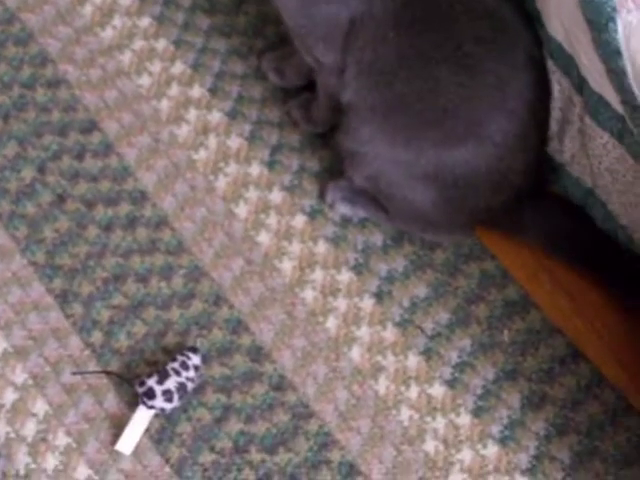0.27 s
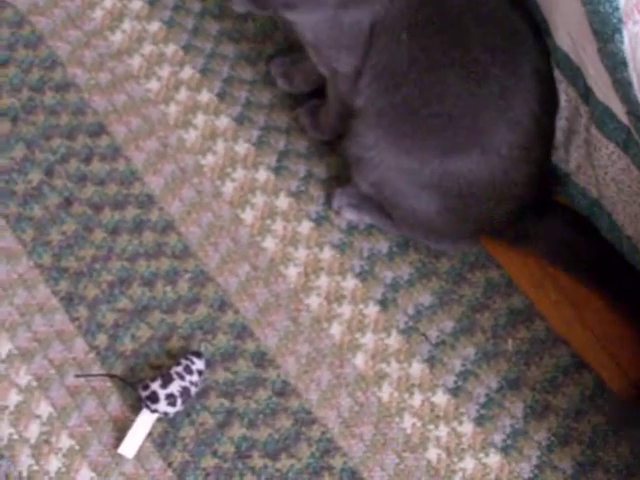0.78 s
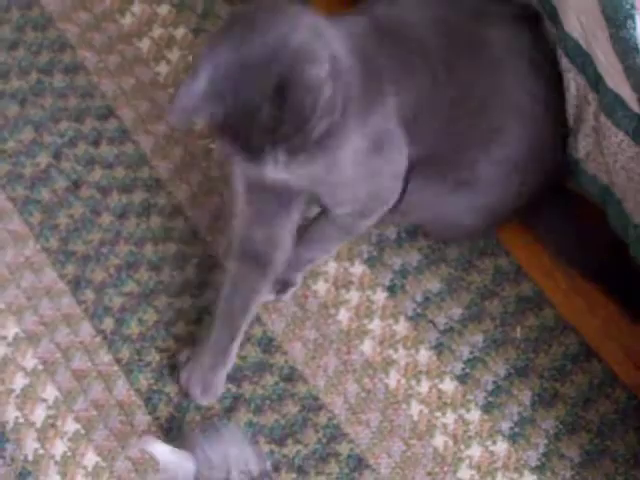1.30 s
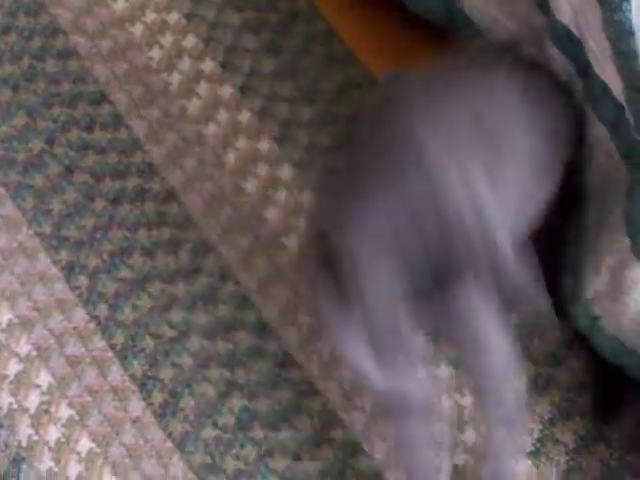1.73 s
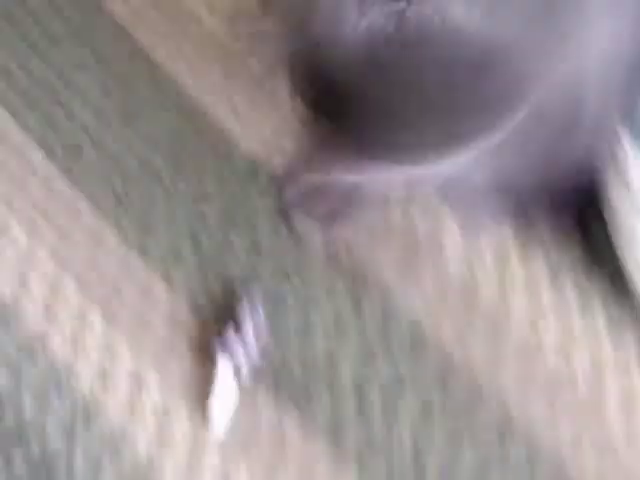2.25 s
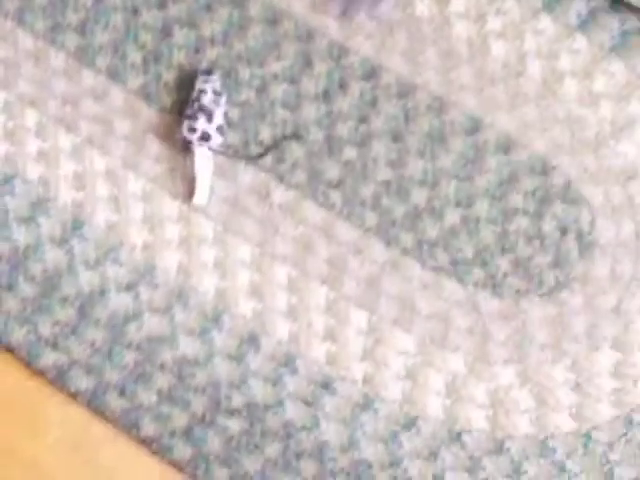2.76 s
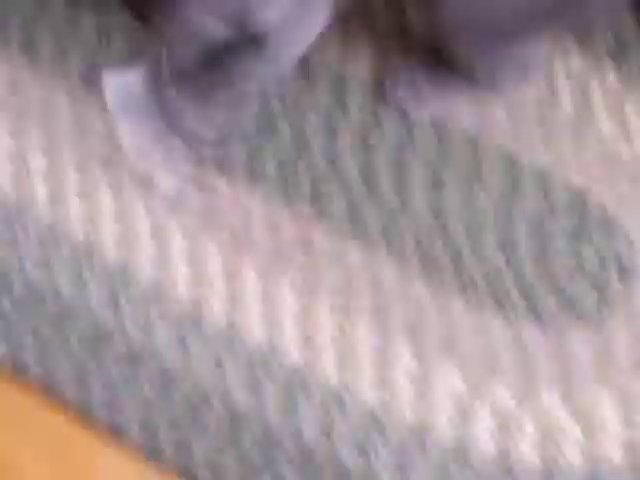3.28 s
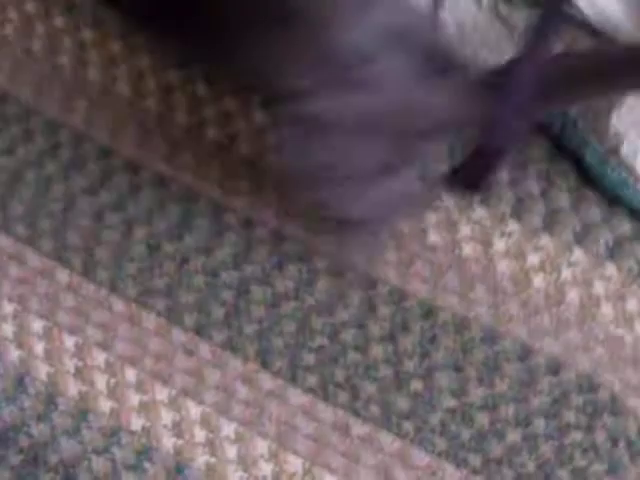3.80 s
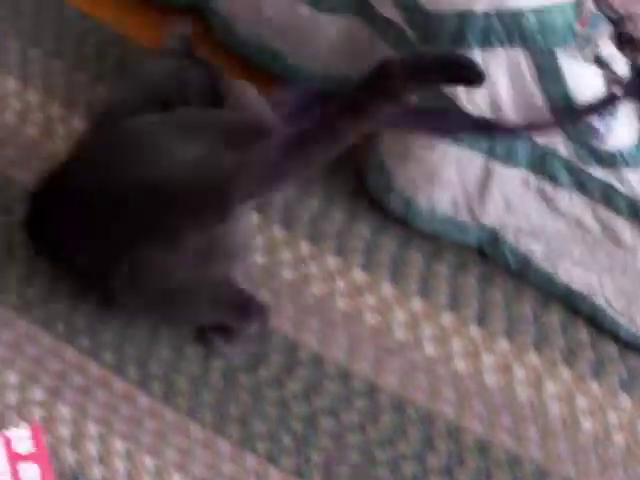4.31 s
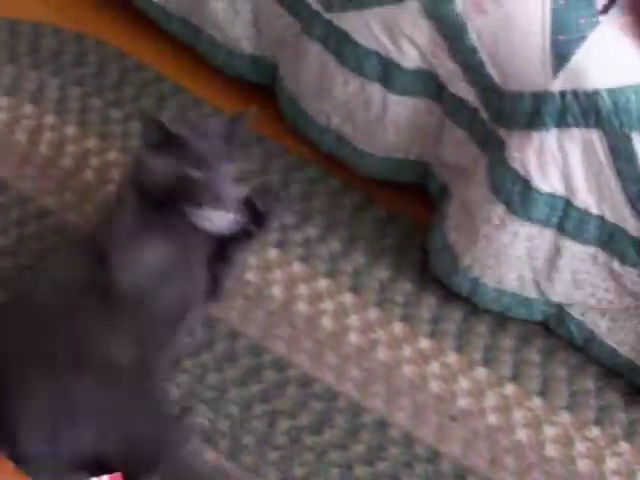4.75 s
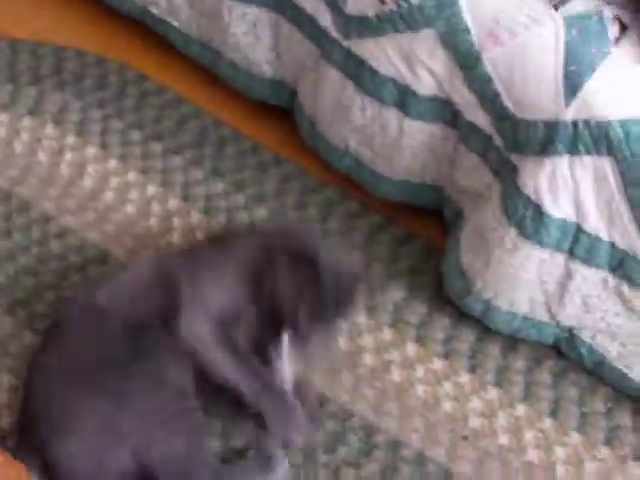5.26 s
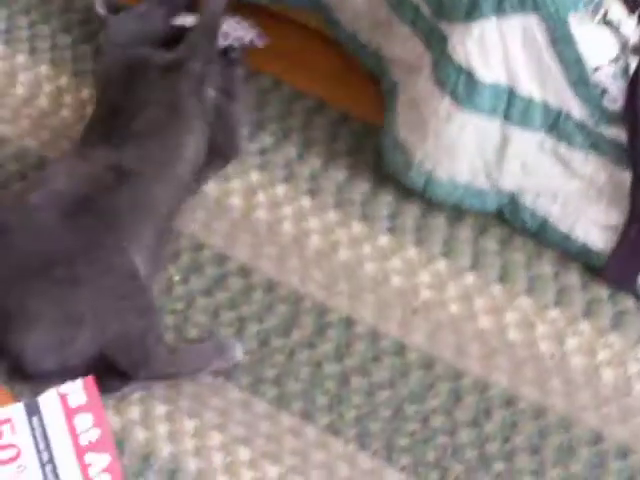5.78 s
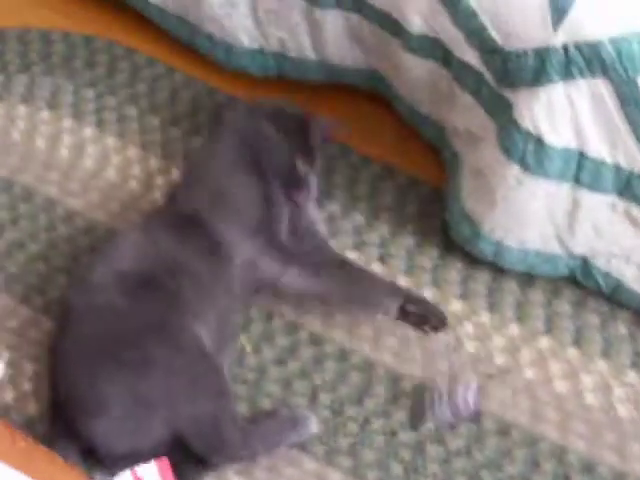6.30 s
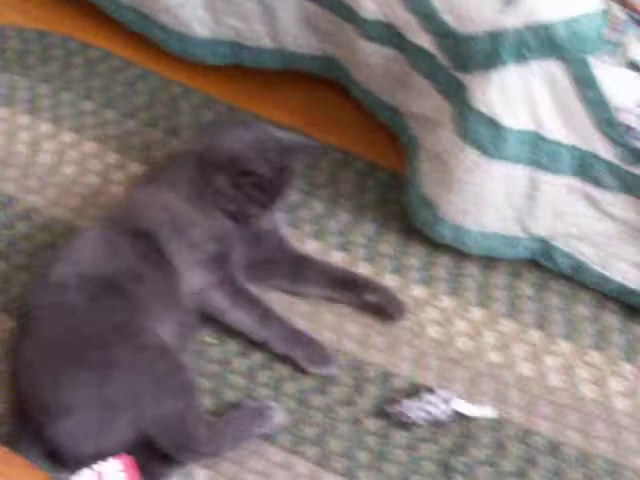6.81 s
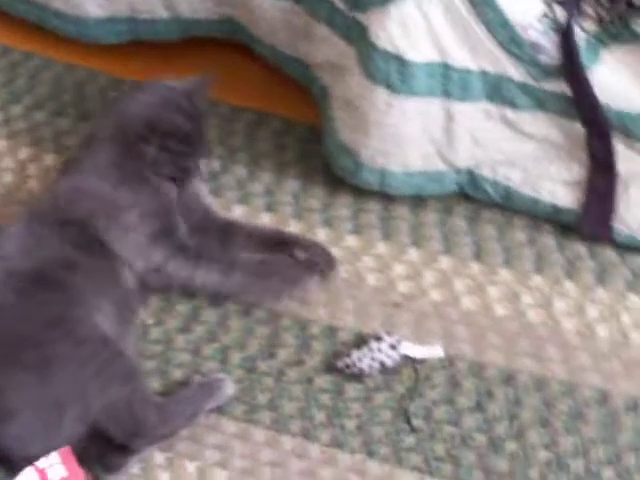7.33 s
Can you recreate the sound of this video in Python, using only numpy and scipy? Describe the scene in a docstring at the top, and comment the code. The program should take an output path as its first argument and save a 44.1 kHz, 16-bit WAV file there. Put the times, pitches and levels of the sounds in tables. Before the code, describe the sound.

A cat plays on a woven rug over floorboards, close to a hand-held microphone in a quiet room with low hiss. The first second holds only faint paw scuffs and a couple of small claw ticks. From about 1.4 seconds the scuffs quicken, with crisp snaps of claws catching threads and a pounce thumping at 2.1 seconds. More dull thumps, scrapes and snaps follow from 2.7 seconds, peaking in a sharp scrabble and landing at 4 seconds. Between 4 and 4.9 seconds a strap's plastic fitting clacks dryly against the microphone's case several times, loudest at about 4.8, over a faint, dull hand rub. The play then softens: light brushing of fur and paws, a scuff and claw snap near 5.6 seconds, a few ticks and gentle bumps from 6.1 to 6.5, and a faint tick at 7 before it settles around 7.5 seconds.

```python
"""A quiet room with a braided rug on a wooden floor, heard close up on a hand-held camera's microphone.
A cat stalks, pounces on and wrestles a toy mouse: paws scuff the weave, claws catch and snap free,
landings thump the boards and fur brushes the pile. Right at the microphone the loose strap clacks
against the camera body, and the hand rubs as it shifts its grip."""
import sys
import numpy as np
from scipy import signal
from scipy.fft import rfft, irfft, next_fast_len
from scipy.io import wavfile
from scipy.ndimage import map_coordinates

SR = 44100
rng = np.random.default_rng(int(sys.argv[2]) if len(sys.argv) > 2 else 0)


def materialize(psi):
    """Save the field psi as 16-bit PCM at rate SR to the path in sys.argv[1].

    A 1-D psi becomes a single channel; in a 2-D psi each row is a channel.
    """
    bounded = np.clip(np.atleast_2d(psi).T, -1, 1)
    quanta = np.round(bounded * 32767).astype(np.int16)
    wavfile.write(sys.argv[1], SR, quanta)


N = 332514
STROKE_S = 0.4

# Spectrum of the weave under a paw, close up: frequency_hz, level_db
WEAVE_SPECTRUM = [(100, -25.5), (400, 0.5), (900, -5), (1600, -2.5), (2700, -0.5), (4700, 3.5), (6500, -2),
                  (9000, -7)]
# Paw strokes on the rug, close to the microphone: peak_time_s, level_db, rise_s
PAW_STROKES = [(0.245, -55.5, 0.0042), (.33, -48.5, 0.066), (.6, -54.5, 0.046), (1.2, -58.5, 0.17),
               (1.371, -42.5, 0.021), (1.461, -45, 0.009), (1.59, -50, 0.019), (1.724, -42.5, 0.022),
               (1.901, -37.5, .009), (2.014, -45.5, 0.06), (2.169, -30.5, 0.0067), (2.6, -53.5, 0.15),
               (2.791, -46, 0.11), (2.96, -42.5, 0.051), (3.04, -45, 0.037), (3.113, -39, 0.007),
               (3.179, -39, 0.029), (3.342, -40, 0.0032), (3.398, -40, 0.056), (3.609, -47.5, 0.021),
               (3.899, -39, 0.0086), (3.978, -40, 0.016), (4.022, -27, .006), (4.048, -27.5, 0.012),
               (4.214, -39.5, 0.069), (4.36, -46, 0.072), (4.921, -48, 0.1), (5.22, -51, 0.051),
               (5.4, -55.5, 0.099), (5.64, -44, 0.062), (6.1, -52.5, .012), (6.343, -52, 0.012),
               (6.622, -57, .05), (7.319, -53.5, 0.029)]
def paw_scuffs():
    """A paw drags over the braids; a slow drag hisses brighter and dies away later than a jab."""
    out, t = np.zeros(N), seconds(STROKE_S)
    lead_s = 0.12
    for peak_time_s, level_db, rise_s in PAW_STROKES:
        fall_s = 0.078 + 2.64 * rise_s
        drag_hz = 3840 * (rise_s / 0.044) ** 0.2
        rub = filtered(friction(), lambda f: amp(along(WEAVE_SPECTRUM, f)) * band(f, drag_hz, 2.6 * drag_hz))
        # the paw speeds up and slows down smoothly, so the stroke has a rounded top
        swell_db = -9 * (np.maximum(lead_s - t, 0) / rise_s) ** 2.45
        fade_db = -60 * (np.maximum(t - lead_s, 0) / fall_s) ** 1.19
        add(out, peak_time_s - lead_s, amp(level_db + swell_db + fade_db) * unit(rub))
    return out


def friction():
    """One drag: dense tiny slips and a few coarser ones, stuttering as they go."""
    size = int(STROKE_S * SR)
    fine = slips(size, spread_db=2.5, per_s=11000)
    coarse = slips(size, spread_db=2.5, per_s=300)
    return (fine + 0.18 * coarse) * amp(2.1 * wobble(130, size))


def slips(size, spread_db, per_s):
    """Fibres slip at random moments, each a tiny impulse of its own size."""
    slipping = rng.random(size) < per_s / SR
    strength, push = rng.standard_normal((2, size))
    return unit(slipping * amp(spread_db * np.clip(strength, -2, 2)) * push)


# Claws catching in the weave, close up: catch_s, level_db, tone_hz
CLAW_SNAPS = [(0.2547, -28.5, 2820), (0.4933, -33, 4700), (1.3734, -20, 4340), (1.4611, -24, 4810),
              (1.4778, -20.5, 4740), (1.6237, -25, 3670), (1.8966, -18, 3590), (1.8993, -17.5, 3540),
              (2.112, -36, 4560), (2.1721, -11.5, 3800), (2.1755, -16.5, 2130), (2.1805, -15, 4100),
              (2.7272, -18.5, 2670), (3.0105, -22, 3500), (3.1766, -18.5, 4500), (3.2135, -26.5, 2900),
              (3.3372, -17, 2730), (3.584, -20, 3320), (3.6157, -27, 3200), (3.631, -26.5, 4460),
              (3.722, -25.5, 4300), (3.8514, -18, 3880), (3.95, -19, 4200), (3.956, -21, 3330),
              (4.0281, -3, 4700), (4.0778, -7, 3160), (5.638, -20, 5160), (5.7095, -29.5, 4250),
              (6.1744, -23, 3830), (6.3426, -23.5, 3300), (6.3729, -40, 2750), (6.5023, -28, 3040),
              (7.0139, -35.5, 3100)]
def claw_snaps():
    """A claw stretches a thread and lets go; nearby fibres settle and the boards beneath knock."""
    out, t = np.zeros(N), seconds(0.04)
    stretch_s = 0.000856
    settling = amp(-30) * decay(t, 0.04)
    for catch_s, level_db, tone_hz in list(CLAW_SNAPS) + snags(per_stroke=2):
        tear_s = 0.0068 * amp(0.17 * level_db)  # a harder pull tears for longer
        snap = rng.standard_normal(len(t)) * (0.3 * decay(t, tear_s) + settling)
        snap[0] += 1
        tick = filtered(snap, lambda f: band(f, tone_hz, 0.65 * tone_hz)
                        * band(f, 0.7 * tone_hz, 2.2 * tone_hz))
        knock = filtered(snap, lambda f: band(f, 1100, 750) * band(f, 1050, 1100))
        knock_db = -14 - 22 * np.log2(tone_hz / 2440)  # a duller snap knocks harder
        release = 1.095 * peak_one(tick) + amp(knock_db) * peak_one(knock)
        add(out, catch_s + stretch_s, amp(level_db) * release)
    return out


def snags(per_stroke):
    """Small catches near each stroke's peak, stronger in a harder one: catch_s, level_db, tone_hz."""
    peak_time_s, stroke_db, _ = np.repeat(PAW_STROKES, per_stroke, axis=0).T
    scatter, strength, tone = rng.standard_normal((len(peak_time_s), 3)).T
    level_db = -36.5 + 0.72 * (stroke_db - stroke_db.mean()) + 5 * strength
    return list(zip(peak_time_s + 0.013 * scatter, level_db, 4100 * np.exp(0.23 * tone)))


# Resonances of the floorboards under the rug: centre_hz, width_hz, gain_db
BOARD_MODES = [(68, 38, 3), (134.2, 66, 0.5), (208.8, 21.5, 4.5), (305, 62, -9), (439, 110, -12)]
# Spectrum of the joists' slow sway: frequency_hz, level_db
JOIST_SPECTRUM = [(10, -16), (22, 1), (45, 2.5), (85, -1), (130, -1), (300, -30), (1000, -87)]
# Paws and body landing near the microphone: start_s, thud_db, tone_hz, pat_relative_db
LANDINGS = [(1.49, -50.5, 172, -54.5), (1.855, -42.5, 300, -64), (1.9, -38, 186, -68),
            (1.941, -38.5, 171, -68), (2.114, -24, 170, -44.5), (2.163, -34, 130, -41),
            (2.728, -27.5, 405, -40), (2.746, -28.5, 194, -66), (3.002, -30, 250, -42.5),
            (3.024, -24.5, 287, -54.5), (3.171, -42.5, 239, -45), (3.4, -41.5, 206, -70),
            (3.722, -40.5, 350, -43.5), (3.949, -27.5, 129, -39.5), (4.014, -27, 182, -46),
            (4.051, -20.5, 207, -56), (4.33, -41.5, 454, -34), (4.479, -38, 303, -52.5),
            (5.708, -47, 222, -64), (6.335, -47.5, 202, -76), (6.502, -49, 350, -50)]
def landings():
    """A soft paw pats the rug and pushes the boards, which drum on while the joists sway."""
    out, t = np.zeros(N), seconds(0.45)
    average_db = np.mean(LANDINGS, axis=0)[1]
    pat_reference_db = 3
    for start_s, thud_db, tone_hz, pat_relative_db in LANDINGS:
        push = 0.037 * rng.standard_normal(len(t)) * decay(t, t60_s=0.19)
        push[0] += 1
        thud = filtered(push, lambda f: resonances(BOARD_MODES, f) * band(f, tone_hz, 0.43 * tone_hz))
        add(out, start_s, amp(thud_db) * peak_one(thud))
        pat = unit(filtered(rng.standard_normal(len(t)), lambda f: band(f, 440, 500) * band(f, 980, 1900)))
        add(out, start_s, amp(pat_reference_db + pat_relative_db) * pat * decay(t, t60_s=0.11))
        sway = coloured(rng.standard_normal(len(t)), JOIST_SPECTRUM)
        sway_db = -50 + 0.77 * (thud_db - average_db)
        onset = 1 - np.exp(-t / 0.022)
        add(out, start_s, amp(sway_db) * sway * onset * decay(t, t60_s=0.64))
    return out


# Thin little squeaks, faint even close up: start_s, peak_db, pitch_hz, t60_s
SQUEAKS = [(0.494, -39, 4900, .08), (1.429, -37, 4800, 0.054), (1.452, -36, 4900, 0.067),
           (6.873, -47, 6200, .07), (7.384, -49.5, 6700, 0.14)]
def squeaks():
    """Friction chirps briefly in a narrow band."""
    out, t = np.zeros(N), seconds(0.12)
    for start_s, peak_db, pitch_hz, t60_s in SQUEAKS:
        burst = rng.standard_normal(len(t)) * decay(t, t60_s)
        chirp = filtered(burst, lambda f: band(f, pitch_hz, 840) ** 2)
        add(out, start_s, amp(peak_db) * peak_one(chirp))
    return out


# Spectrum of fur on the rug's pile, close up: frequency_hz, level_db
PILE_SPECTRUM = [(200, -23.5), (700, -1.5), (1500, -6.5), (2700, 0), (4500, 1.5), (6500, -3), (9000, -10.5)]
def fur():
    """The coat brushes the pile around each stroke, and a little at rest, plucking stray fibres."""
    fine = slips(N, spread_db=0.5, per_s=9000)
    stray = slips(N, spread_db=0.5, per_s=40)
    brush = coloured(fine + 0.27 * stray, PILE_SPECTRUM)
    rest_db, linger_s = -61.5, 0.38
    peak_time_s, stroke_db, _ = np.transpose(PAW_STROKES)
    t = np.linspace(0, N / SR, 800)
    move_db = -61 + 0.48 * (stroke_db - stroke_db.mean())
    moves = amp(move_db) * np.exp(-np.abs(t[:, None] - peak_time_s) / linger_s)
    motion = np.hypot(amp(rest_db), np.linalg.norm(moves, axis=1))
    return np.interp(np.arange(N) / SR, t, motion) * amp(0.64 * wobble(33, N)) * brush


# Resonances of the camera case that holds the microphone: centre_hz, width_hz, gain_db
CASE_MODES = [(260, 260, -2.5), (779, 320, -1.5), (1240, 150, 0.5), (1767, 190, -0.5), (2127, 222, 2.5),
              (2590, 175, 1.5), (3420, 660, -2.5), (4830, 780, -0.5), (5860, 350, 1.5), (6310, 650, 1.5),
              (7250, 1500, -6)]
# The strap's fitting striking the case, right at the microphone: start_s, peak_db, tone_hz, chatter_s
STRAP_CLACKS = [(4.0153, -17, 4100, 0.0055), (4.0189, -9.5, 2440, .006), (4.2144, -11, 3060, 0.015),
                (4.33, -17, 3380, .009), (4.3355, -13, 2790, 0.014), (4.340, -18.5, 1800, 0.052),
                (4.3713, -21, 1400, 0.0036), (4.4907, -5, 2750, .005), (4.5113, -33.5, 1300, .003),
                (4.5404, -31, 1390, 0.0051), (4.6981, -8.5, 3140, 0.0096), (4.792, -24, 1500, .003),
                (4.7953, -15, 1650, .009), (4.8298, -7, 4280, 0.024), (4.8332, -1.5, 3910, 0.0072),
                (4.835, -2, 2600, 0.0092), (7.0168, -34.5, 1070, 0.011)]
def strap_clacks():
    """Hard plastic chatters on the case; each spot it strikes rings the modes a little differently."""
    out, t = np.zeros(N), seconds(0.06)
    for start_s, peak_db, tone_hz, chatter_s in STRAP_CLACKS:
        blow = 0.16 * rng.standard_normal(len(t)) * decay(t, chatter_s)
        blow[0] += 1
        modes = [(centre_hz * rng.normal(1, 0.012), width_hz, rng.normal(gain_db, 1.5))
                 for centre_hz, width_hz, gain_db in CASE_MODES]
        clack = filtered(blow, lambda f: resonances(modes, f) * band(f, tone_hz, 0.84 * tone_hz))
        add(out, start_s, amp(peak_db) * peak_one(clack))
    return out


def strap_slide():
    """The fitting scrapes along the case, swelling into its hardest clack."""
    start_s, length_s, midway_db, swell_db = 4.805, 0.0243, -31.5, 11
    out, t = np.zeros(N), seconds(length_s)
    scrape = unit(filtered(friction(), lambda f: band(f, 4000, 4500))[:len(t)])
    add(out, start_s, amp(midway_db + swell_db * (t / length_s - 0.5)) * scrape)
    return out


# Spectrum of handling noise at the microphone: frequency_hz, level_db
HAND_SPECTRUM = [(60, -22.5), (180, -14.5), (280, -2), (355, 1), (430, -4.5), (550, -12.5), (1200, -23),
                 (4000, -55.5)]
# Shifts of grip on the camera: peak_time_s, level_db, half_length_s
GRIP_SHIFTS = [(.3, -68.5, 0.26), (1.15, -56, 0.18), (1.9, -61.5, 0.14), (2.72, -55.5, 0.26),
               (4.2, -52.5, 0.35), (6.05, -57, 0.49), (7.52, -53, 0.093)]
def handling():
    """The hand rubs dully on the camera, swelling at each shift of its grip."""
    t = np.arange(N) / SR
    rest_db = -69.5
    rub = coloured(rng.standard_normal(N), HAND_SPECTRUM)
    shifting = sum(amp(level_db) * np.exp(-((t - peak_time_s) / half_length_s) ** 2)
                   for peak_time_s, level_db, half_length_s in GRIP_SHIFTS)
    return np.hypot(amp(rest_db), shifting) * rub


# Reverberation of the furnished room: frequency_hz, t60_s
ROOM_DECAY = [(150, 0.48), (1500, .28), (7000, 0.25)]
def reverberation(sound):
    """The walls answer briefly, the treble dying first."""
    hz, t, noise = signal.stft(rng.standard_normal(SR // 2), SR, nperseg=256)
    tail = signal.istft(noise * decay(t, along(ROOM_DECAY, hz)[:, None]), SR, nperseg=256)[1]
    return signal.fftconvolve(sound, tail / np.linalg.norm(tail))[:N]


# Spectrum of the quiet room at the microphone: frequency_hz, level_db
ROOM_SPECTRUM = [(10, -12), (25, -0.5), (50, 0.5), (120, -0.5), (250, 0), (500, -5.5), (1000, -9),
                 (2000, -13), (4000, -19.5), (7000, -18), (9000, -15)]
def room_tone():
    """Still room air and microphone hiss make a steady, low noise."""
    return amp(-54.5) * coloured(rng.standard_normal(N), ROOM_SPECTRUM)


def amp(db):
    """Decibels as an amplitude."""
    return 10 ** (np.asarray(db) / 20)


def decay(t, t60_s):
    """An envelope that falls 60 dB in t60_s."""
    return amp(-60 * t / t60_s)


def unit(x):
    """x scaled to an RMS of 1."""
    return x / np.sqrt(np.mean(x ** 2) + 1e-20)


def peak_one(x):
    """x scaled to a peak of 1."""
    return x / np.abs(x).max()


def seconds(length_s):
    """The time of each sample."""
    return np.arange(int(length_s * SR)) / SR


def wobble(knots_per_s, size):
    """A smooth random curve."""
    knots = rng.standard_normal(int(size * knots_per_s / SR) + 4)
    return map_coordinates(knots, [np.arange(size) * knots_per_s / SR])


def along(points, hz):
    """Rows of frequency_hz, value, interpolated on a log frequency axis."""
    frequencies, values = np.transpose(points)
    return np.interp(np.log(hz + 1), np.log(frequencies + 1), values)


def filtered(x, response):
    """x through a complex response of frequency."""
    size = next_fast_len(len(x) + 4096)
    return irfft(rfft(x, size) * response(np.fft.rfftfreq(size, 1 / SR)), size)[:len(x)]


def coloured(x, spectrum):
    """x shaped by a spectrum table, at an RMS of 1."""
    return unit(filtered(x, lambda f: amp(along(spectrum, f))))


def band(f, centre_hz, width_hz):
    """One causal resonance."""
    return 1j * f * width_hz / (centre_hz ** 2 - f ** 2 + 1j * f * width_hz)


def resonances(modes, f):
    """The response of an object whose modes alternate in sign."""
    return sum((-1) ** k * amp(db) * band(f, hz, width) for k, (hz, width, db) in enumerate(modes))


def add(track, start_s, sound):
    """Lay a sound into the track."""
    start = max(round(start_s * SR), 0)
    track[start:start + len(sound)] += sound[:N - start]


def scene():
    """The cat close by on the rug, the strap at the microphone, and the room around them."""
    cat = paw_scuffs() + claw_snaps() + landings() + squeaks()
    strap = strap_clacks() + strap_slide()
    # the strap reaches the microphone through the case, so it is almost dry
    reflections = reverberation(amp(-11.5) * cat + amp(-29.5) * strap)
    return (cat + strap + reflections + fur() + room_tone() + handling())[None]


# Treble roll-off of the camera's microphone: frequency_hz, gain_db
MIC_RESPONSE = [(6600, -0.5), (7400, -3.5), (8000, -10), (8700, -22.5), (9500, -55), (12000, -63)]
def record(dry):
    """The small camera rolls off the treble, clips the hardest peaks and limits the bandwidth."""
    clip_level, top_hz = 0.72, 15800
    dulled = filtered(dry[0], lambda f: amp(along(MIC_RESPONSE, f)))
    clipped = np.clip(dulled, -clip_level, clip_level)
    return filtered(clipped, lambda f: 1 / np.sqrt(1 + (f / top_hz) ** 120))[None]


dry = scene()
out = record(dry)
materialize(out)
```